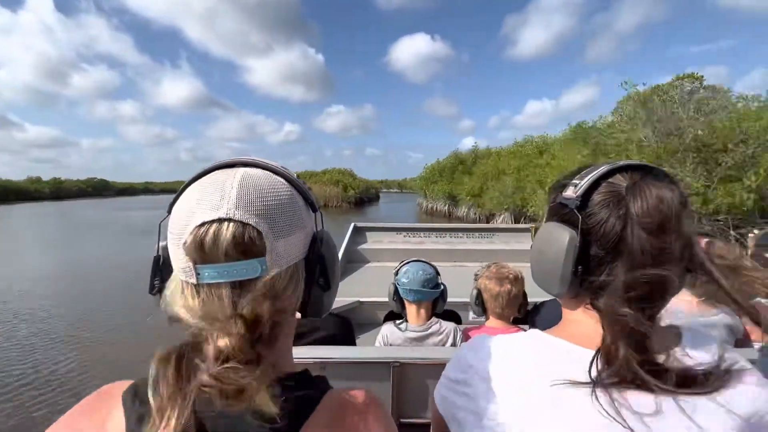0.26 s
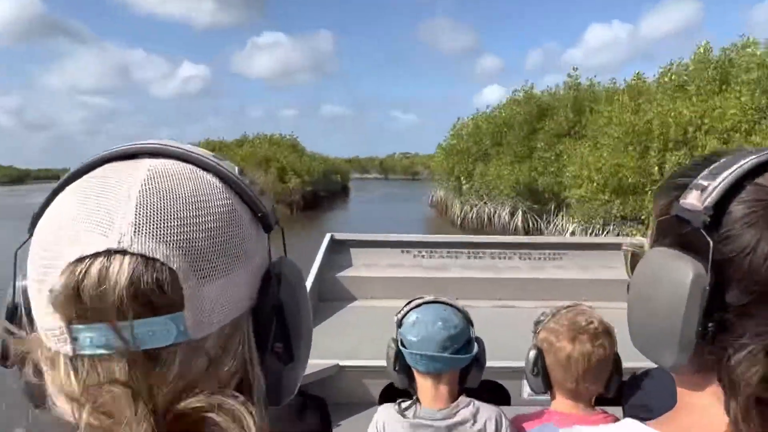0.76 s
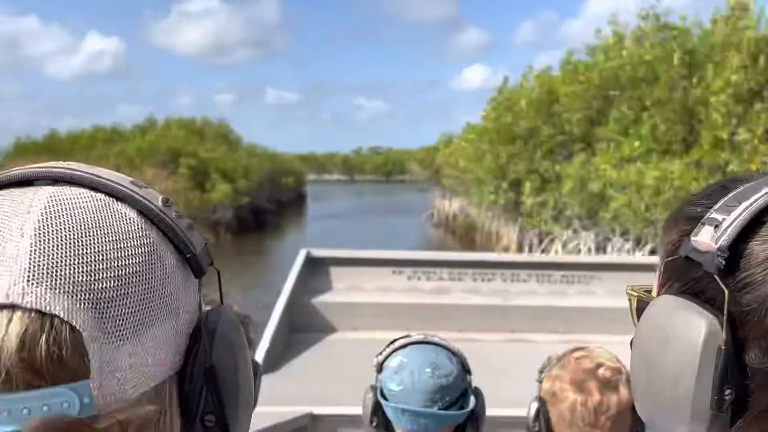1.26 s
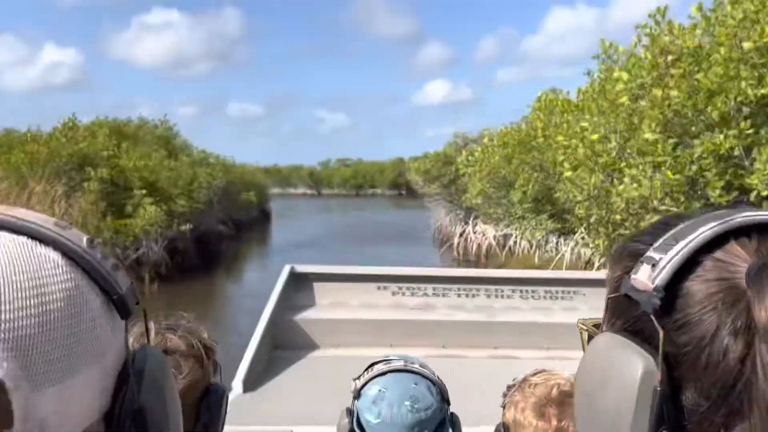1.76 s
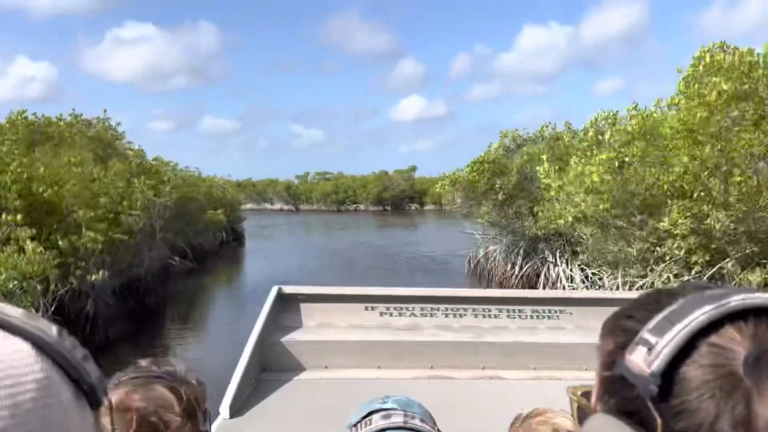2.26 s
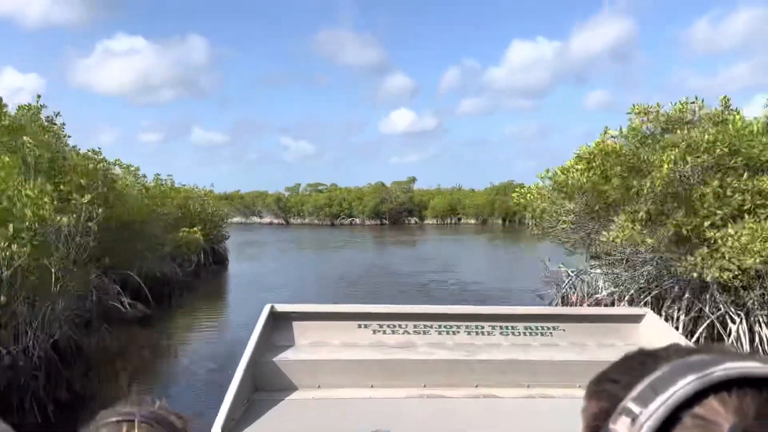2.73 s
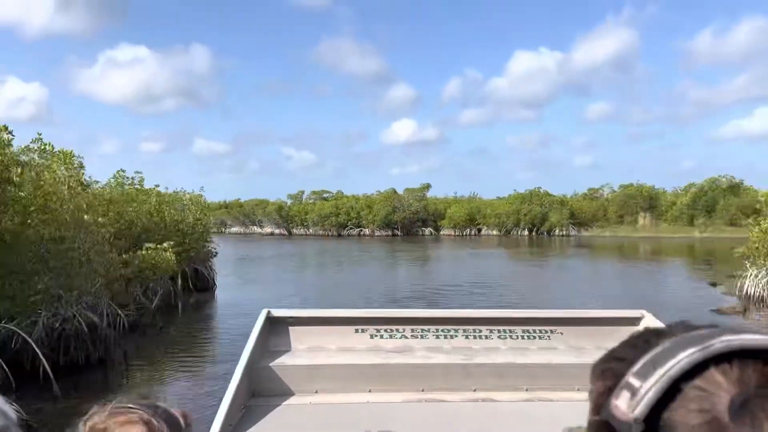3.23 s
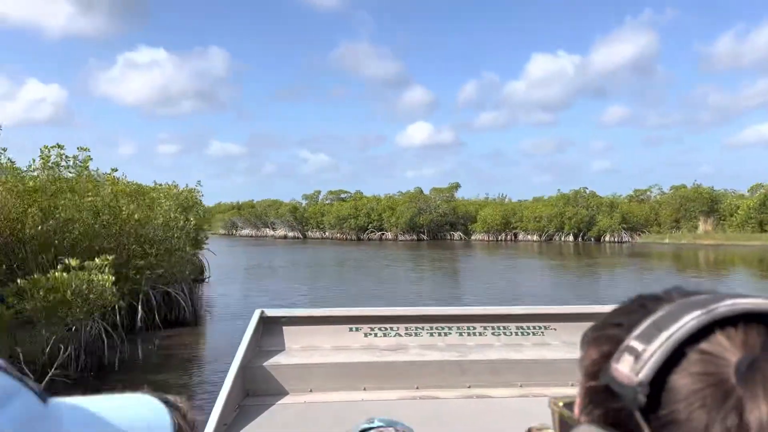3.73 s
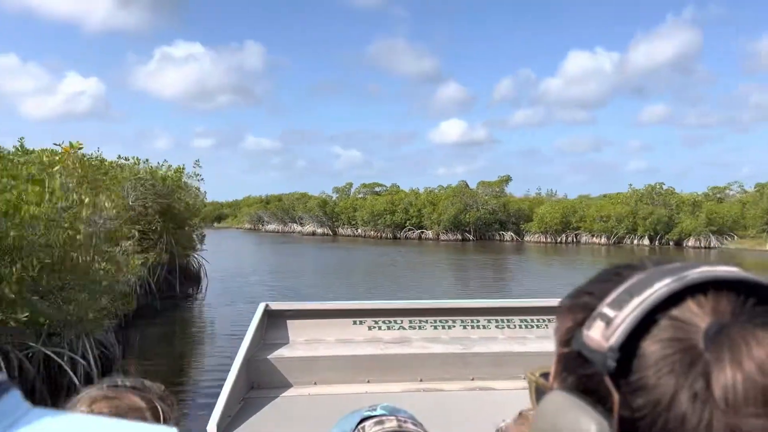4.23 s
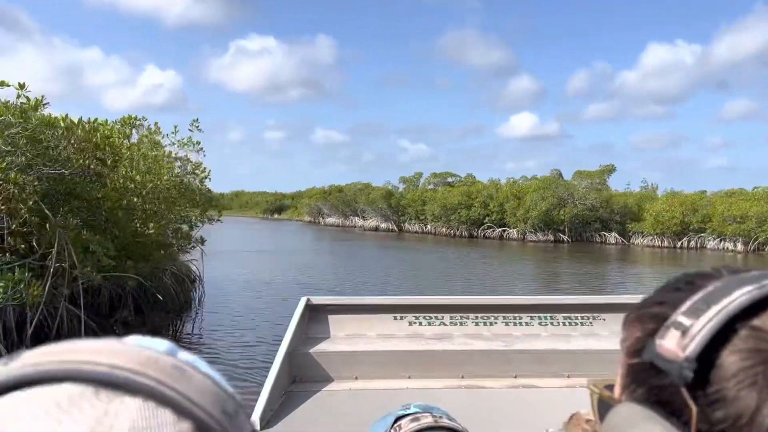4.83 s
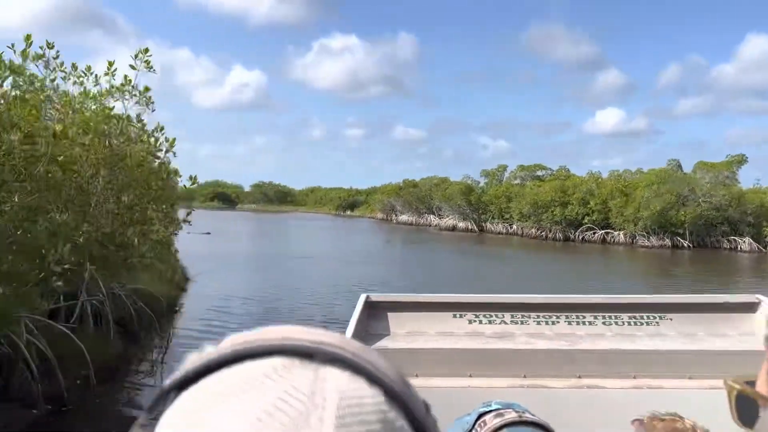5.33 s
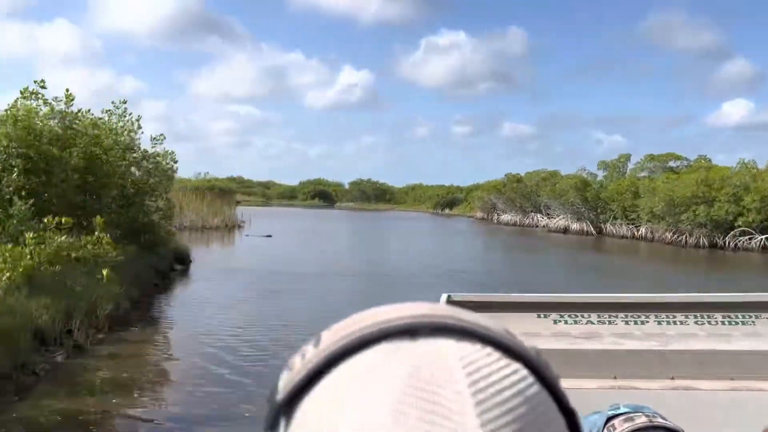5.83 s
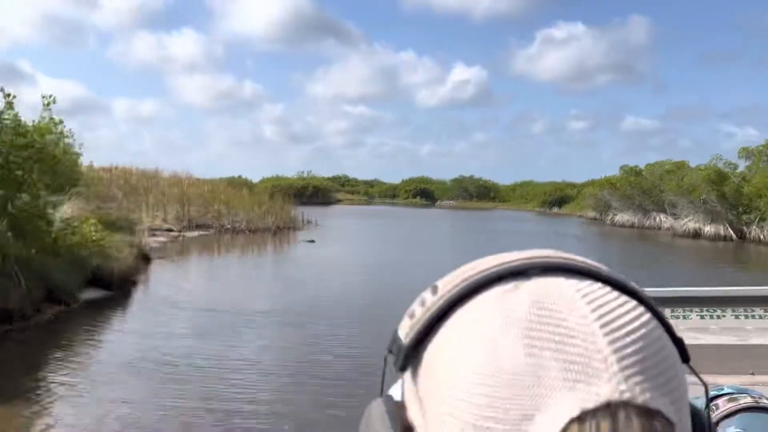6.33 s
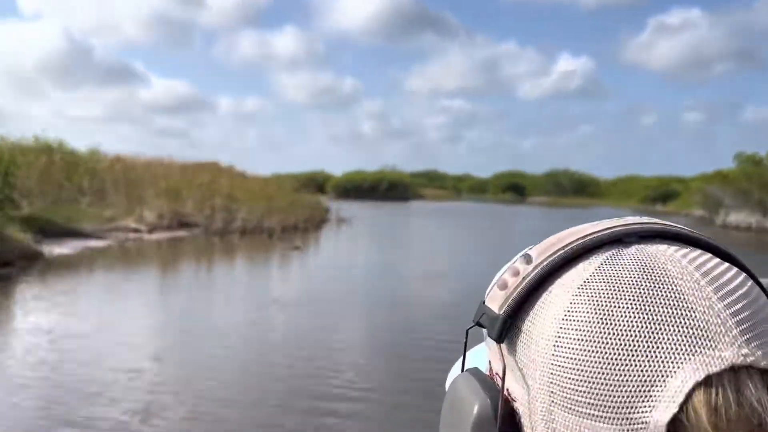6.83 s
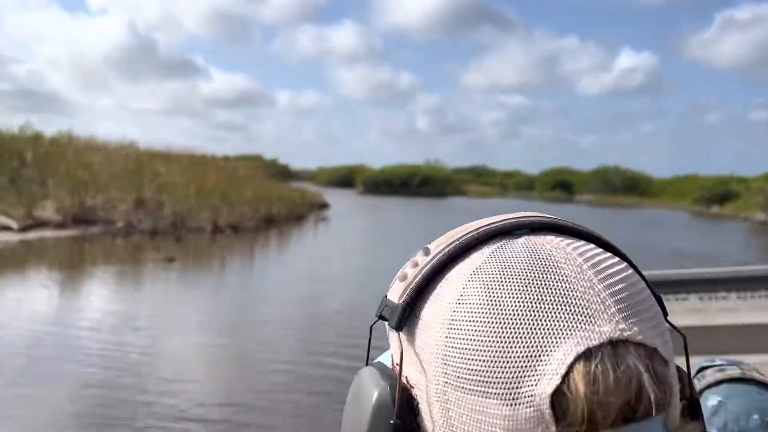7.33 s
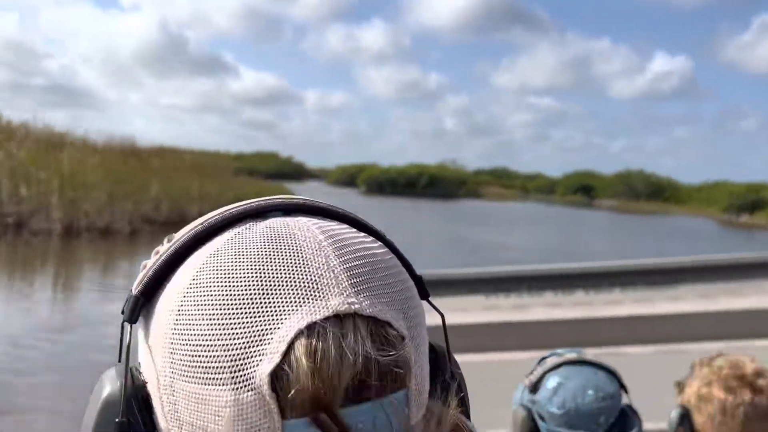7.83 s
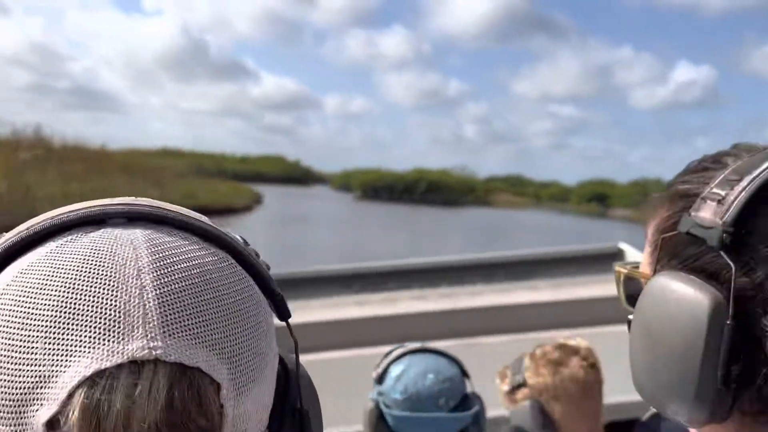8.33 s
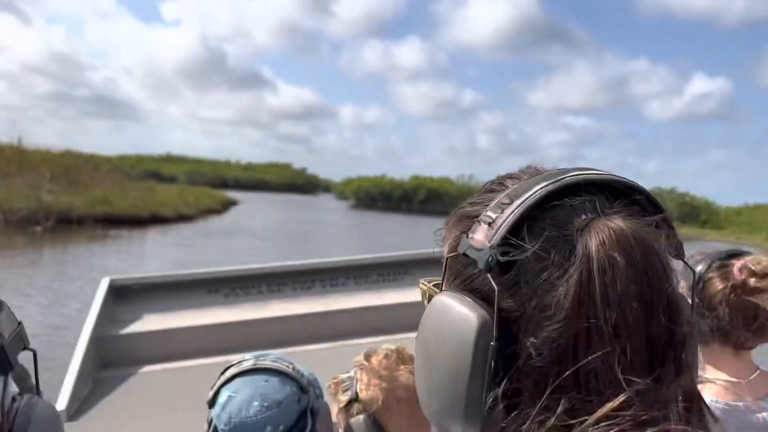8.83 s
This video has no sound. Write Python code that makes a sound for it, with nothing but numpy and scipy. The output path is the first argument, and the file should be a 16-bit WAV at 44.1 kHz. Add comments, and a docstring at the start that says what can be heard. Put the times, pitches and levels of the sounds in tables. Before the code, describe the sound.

Low chopped propeller roar of a moving airboat, heard from the seats, with spray hiss and gusting headwind that swells past the middle.

```python
"""An airboat under way, heard from the seats in front of its engine through hand-held stereo microphone ports.
A geared three-blade propeller drones in blade-pass tones, exhaust tones throb against it, and shaped noise makes
the chopped roar, spray, hiss and buffeting headwind. Churned water is close at first and fades by 1.5 s.
The wind surges past 6 s, the drone sags near 7 s and sharp gusts tick on the ports while the holder turns;
then a faint whine comes up, the drone recovers, and wash and wind swell again at the end."""
import sys
import numpy as np
from scipy import signal
from scipy.fft import rfft, irfft, next_fast_len
from scipy.io import wavfile
from scipy.ndimage import uniform_filter1d, map_coordinates

SR = 44100
rng = np.random.default_rng(int(sys.argv[2]) if len(sys.argv) > 2 else 0)


def output_pcm(signal):
    """Save a mono or channel-first signal as 16-bit PCM at the path in sys.argv[1].

    Samples are clipped to [-1, 1] before scaling.
    """
    pcm = np.clip(np.atleast_2d(signal).T, -1, 1) * 32767
    wavfile.write(sys.argv[1], SR, np.round(pcm).astype(np.int16))


N = 399987

BLADES, GEAR = 3, 2.2916  # blades; crank turns for each propeller turn
BLADE_START = .46  # starting angle (turns of the blade pass)
SLAP = 2.4  # the slap of each blade leads the blade-pass tone by this (rad)
FLUTTER_DB = 1.5  # fast chance swings of the wind

# Spectrum of wind turbulence on the ports: (frequency [Hz], relative density [dB per Hz])
BUFFET = [(13, -55), (22, -35), (58, -5), (89, -3), (134, -11), (260, -12.5), (400, -16.5), (544, -22),
          (772, -27), (1370, -41), (3000, -55), (3900, -78), (6600, -120)]


def propeller(blade):
    """Each passing blade presses on the air: harmonics of the blade pass, lined up into a slap."""
    # Multiples 1, 2, 3 .. of blade pass: (left level [dB], right level [dB], left lead [rad],
    # left change at a full turn of the holder [dB], right change [dB])
    harmonics = [(-17.0, -17.5, -0.06, 1.5, 1.0), (-30.0, -34.0, -0.24, -3.0, 0.0),
                 (-29.0, -26.5, 0.13, -1.0, -3), (-43.0, -35.0, 1.47, 7.0, -5.0),
                 (-44, -33.5, 0.0, 7.0, -11.0), (-50.5, -44.5, -1.2, 8, -3),
                 (-44.0, -36.0, 1.77, -2.0, -12.0), (-45.5, -34.5, 1.44, -5.0, -20.0),
                 (-44.5, -31.5, 0.58, -4.0, -16.0), (-49, -43.5, 0.64, 0, 8),
                 (-55.0, -45.0, 0.74, 1.0, -7.0), (-54.5, -47.5, 0.16, -7.0, -8.0),
                 (-52.5, -49.5, 0.08, -6.0, 4.0), (-48.5, -40.5, -0.87, -10.0, -9.0),
                 (-50.5, -45.0, -3.02, -15.0, -14.0), (-58.0, -48.5, -0.73, 0.0, -10.0),
                 (-48.0, -44, -1.1, -15.0, -14.0), (-51.0, -49.0, -1.89, -19.0, -11.0),
                 (-57.0, -49.0, -2.26, -12.0, -14.0), (-63.5, -54.0, -1.38, -9.0, -14.0),
                 (-60.5, -54.5, -1.28, -7.0, -15.0), (-65.5, -56.0, -1.12, -5.0, -15.0)]
    # The holder turning: (time [s], share of the turn [0-1], overtone gain [dB],
    # left port open to the middle tones [dB])
    holder = [(0, 0, 0, 8.5), (.45, 0, 0, 7.5), (1.3, 0, 0, 0), (3.5, .1, .5, 0), (5.8, .3, 1, 0),
              (7.2, .65, 1, 0), (8.6, .85, 1, 0), (9.07, .75, 2, 0)]
    open_order = 11  # the multiple that the open left port lifts most
    orders = np.arange(len(harmonics)) + 1
    turn, overtone_db, open_db = curves(holder)
    shade_db = []  # the body shades each port its own way
    for k, (*_, left, right) in zip(orders, harmonics):
        opening = np.exp(-2 * np.log(k / open_order) ** 2) * open_db
        port_db = np.array([turn * left + opening, turn * right])
        shade_db.append((1 - 1 / k) * overtone_db + port_db)
    return tones(orders, harmonics, blade, shade_db, waver_db=.75, drift=.4, slap=SLAP)


def exhaust(blade):
    """Uneven firing beats at half orders of the crank, which is geared to the propeller."""
    # One row for each half order: (left level [dB], right level [dB], left lead [rad])
    beat_levels = [(-36.5, -37, 0), (-25.5, -26.5, -.07), (-35, -35, -.2), (-44, -43, -.25),
                   (-38, -40, -.4), (-35.5, -40, .2), (-45, -37, 2.4), (-41.5, -38, .3), (-47, -48, 3),
                   (-48, -52, -.26), (-46, -39.5, .6), (-48, -51, -.1), (-59, -49, .2), (-56, -50, -.3),
                   (-57, -52, .4), (-52.5, -46.5, .8), (-56, -50, .8), (-47.5, -50, 1.1)]
    # Tones that sound: (multiple [halves of the crank speed])
    half_orders = [2, 3, 5, 6, 7, 8, 9, 10, 11, 12, 13, 14, 15, 18, 22, 24, 25, 26]
    crank_start = .19  # turns
    crank = (blade - 2 * np.pi * BLADE_START) * GEAR / BLADES + 2 * np.pi * crank_start
    beats = np.array(half_orders) / 2
    return tones(beats, beat_levels, crank, 0 * beats, waver_db=.8, drift=.25, slap=0)


def whine(blade):
    """A faint high tone that follows the propeller speed with a random drift of phase."""
    # Fader: (time [s], level [dB])
    whine_db = [(0, -80), (7.6, -68), (7.9, -56), (8.35, -58), (8.5, -63), (9.07, -62)]
    phase = 36.8 * blade + .8 * wobble(8)  # multiples of blade pass
    return np.sqrt(2) * amp(curves(whine_db)[0]) * np.cos(phase)


def tones(orders, levels, angle, gains_db, waver_db, drift, slap):
    """Multiples of a shaft angle, lined up into a pulse by slap; higher ones waver more in the turbulent air."""
    waver_grows, waver_top = .35, 5  # growth by octave of the multiple, up to this multiple
    out = np.zeros((2, N))
    for k, (left_db, right_db, lead, *_), gain_db in zip(orders, levels, gains_db):
        high = 1 - orders[0] / k
        smear = high * rng.normal(0, .55)  # echoes off the hull and seats spread the pulse
        phase = k * angle + slap * (k - 1) + smear + drift * high * wobble(3)
        depth_db = waver_db * (1 + waver_grows * np.log2(min(k / orders[0], waver_top)))
        swing_db = depth_db * (wobble(7) + wobble(1.5) / 2)
        level = np.sqrt(2) * amp(gain_db + swing_db - depth_db ** 2 / 7)  # offsets the power the swings add
        out += level * amp([[left_db], [right_db]]) * np.cos(phase + [[lead / 2], [-lead / 2]])
    return out


def airflow(blade):
    """Noise from moving air and water: blade roar, spray and wash along the hull, and a thin steady slipstream."""
    # Spectra of the roar, spray, wash and hiss: (frequency [Hz], relative density [dB per Hz])
    roar_colour = [(60, -24), (110, -17), (200, -17), (290, -15.5), (380, -7), (480, -10.5), (600, -12.5),
                   (750, -10.5), (950, -12.5), (1200, -12), (1550, -13.5), (2050, -18), (2600, -24),
                   (4000, -25.5), (7000, -69)]
    spray_colour = [(1200, -6), (2000, -27), (3830, -13.5), (5000, -5.5), (6710, -6.5), (8000, -10.5),
                    (9300, -18), (11000, -107), (16000, -33)]
    wash_colour = [(450, -16), (800, -3), (1250, 17), (1700, -33), (2400, 0.5), (3500, 3.5), (5500, 0.5),
                   (9500, -5.5), (11000, -59)]
    hiss_colour = [(6000, -30), (8500, -4), (10500, -4), (11700, 0), (13500, -5), (15700, -6)]
    # Stereo width: (frequency [Hz], left-right likeness [correlation])
    likeness = [(170, .95), (340, .65), (520, .35), (1000, .45), (2300, .55), (3200, .17), (7000, .22),
                (15000, .2)]
    # Faders of roar and spray: (time [s], roar level [dB], spray level [dB])
    flow_db = [(0, -29.5, -35), (.55, -30, -38.5), (1.15, -34, -41.5), (2.4, -32, -39), (3.6, -31.5, -37.5),
               (4.6, -31, -38.5), (6.6, -32.5, -41), (7.7, -33.5, -43), (8.4, -33.5, -41),
               (9.07, -31, -37.5)]
    # Fader of the churned water close by: (time [s], level [dB])
    wash_db = [(0, -35.5), (.35, -34.5), (.7, -35), (1.0, -41.5), (1.5, -56), (8.2, -73), (9.07, -43)]
    roar_db, spray_db = curves(flow_db)
    shared = wobble(9)  # roar and spray swell together
    roar = ports(patchy(1.7) * chopped(blade, blade_db=.96, turn_db=.5), roar_colour, likeness)
    spray = ports(patchy(1.3) * chopped(blade, blade_db=1.1, turn_db=.5), spray_colour, likeness)
    wash = ports(patchy(2.2) * chopped(blade, blade_db=2.2, turn_db=.5), wash_colour, likeness)
    hiss = ports(patchy(2.5), hiss_colour, likeness)
    roar *= amp(roar_db + .27 * shared)
    spray *= amp(spray_db + .12 * shared)
    wash *= amp(curves(wash_db)[0])
    return shadowed(roar + spray + wash) + amp(-47) * hiss


def chopped(blade, blade_db, turn_db):
    """Loudness peaks once per blade, and once per turn as the blades differ."""
    return amp(blade_db * np.cos(blade + SLAP) - turn_db * np.cos(blade / BLADES))


def shadowed(x):
    """The hand and the housing shade and delay one port against the other."""
    # Balance: (frequency [Hz], left minus right [dB])
    lean = [(60, 12), (110, 22), (200, -25), (380, -7), (700, -5), (1290, -4.5), (2380, -0.5), (4400, 1),
            (8120, 5.5), (15000, -16)]
    # Phase: (frequency [Hz], left lead [rad])
    lead = [(300, 0), (720, 1.0), (1100, 0), (1650, -1.5), (2400, 0), (3300, -.7), (4500, .3)]

    def half(hz):
        return amp(along(lean, hz) / 2) * np.exp(.5j * along(lead, hz))
    return filtered(x, lambda hz: np.array([half(hz), 1 / half(hz)]))


def headwind():
    """Turbulence buffets both ports: lumpy steady wind and duller strong eddies."""
    # Fader of the steady wind: (time [s], level [dB])
    wind_db = [(0, -38.5), (.5, -24.5), (1.25, -22), (1.7, -25), (2.6, -27), (3.5, -28), (4.8, -29.5),
               (5.6, -24.5), (6.4, -20), (7.2, -19.5), (7.9, -22.5), (8.4, -25.5), (9.07, -18)]
    alike = [(40, .86), (150, .9), (600, .73)]  # (frequency [Hz], left-right likeness [correlation])
    eddy_hz, eddy_dull_db = 256, -7  # strong eddies are duller above this
    lumps_db = 2.1  # slower chance swings
    swing_db = lumps_db * wobble(9) + FLUTTER_DB * wobble(35)
    steady = amp(curves(wind_db)[0] + swing_db) * ports(patchy(1.26), BUFFET, alike)

    def dull(hz):
        return amp(eddy_dull_db / (1 + (eddy_hz / (hz + 1)) ** 4))
    eddies = gusts() * filtered(ports(patchy(.94), BUFFET, alike), dull)
    return steady + eddies


def gusts():
    """A short bell-shaped swell of power for each strong eddy, with some flutter."""
    # Single strong eddies: (time [s], peak level before flutter and dulling [dB])
    eddy_peaks = [(.66, -18), (.93, -31), (1.07, -26), (1.23, -12), (1.38, -16), (1.66, -16.5), (2.12, -24),
                  (2.5, -14.5), (3.59, -29), (3.95, -23), (5.03, -25), (5.5, -16.5), (5.76, -21),
                  (5.92, -16.5), (6.02, -18), (6.1, -18.5), (6.25, -14), (6.43, -14), (6.63, -12),
                  (6.72, -11), (6.85, -13.5), (6.95, -26), (7.06, -12), (7.15, -18), (7.22, -17),
                  (7.45, -16.5), (7.63, -12.5), (7.76, -22), (8.03, -19), (8.18, -26), (8.36, -15.5),
                  (8.67, -17.5), (8.78, -12.5), (9.02, -24)]
    rise_s, fall_s = .026, .034
    t, power = np.arange(N) / SR, np.zeros(N)
    for s, db in eddy_peaks:
        near = slice(max(round(s * SR) - SR // 4, 0), round(s * SR) + SR // 4)
        late = t[near] - s
        width = np.where(late < 0, rise_s, fall_s)
        power[near] += amp(db) ** 2 * np.exp(-(late / width) ** 2)
    return np.sqrt(power) * amp(FLUTTER_DB * wobble(35))


def ticks():
    """Sharp gusts tick on the ports: an uneven dying ring, a low push against it and a puff of noise."""
    # One row a tick: (time [s], strength before the common lift [dB], pitch [Hz], fade by 60 dB [cycles])
    tick_list = [(1.0335, -27, 2500, 11), (2.0206, -45, 2500, 11), (6.716, -28, 4200, 20),
                 (6.7165, -31, 2300, 14), (6.7635, -42, 2200, 14), (6.8494, -40, 2600, 14),
                 (6.946, -41, 4200, 16), (7.0500, -45, 2800, 14), (7.073, -27, 3300, 13),
                 (7.144, -28, 3100, 20), (7.21, -33, 2700, 14), (7.386, -37, 4000, 16),
                 (7.415, -43, 3200, 12), (7.5325, -37, 2400, 22), (7.572, -33, 3000, 16),
                 (7.599, -33, 2400, 32), (7.605, -31, 3000, 30), (7.741, -41, 2000, 30),
                 (8.7767, -29, 2600, 18)]
    unevenness, push_db, puff_db = 1.1, 2, -6
    t, out = np.arange(SR // 30) / SR, np.zeros(N)

    def ring(hz, cycles):
        return np.sin(2 * np.pi * hz * t) * amp(-60 * t * hz / cycles)
    push = amp(push_db) * ring(1400, 12)
    for s, db, hz, cycles in tick_list:
        rattle = 1 + unevenness * uniform_filter1d(rng.standard_normal(len(t)), size=9) * 3
        puff = amp(puff_db - 60 * t / .031) * rng.standard_normal(len(t))
        onset = amp(db + 6.5) * (1 - np.exp(-t / .0004))
        out[round(s * SR):][:len(t)] += onset * (ring(hz, cycles) * rattle - push + puff)
    return filtered(out, lambda hz: 1 / (1 + (hz / 5000) ** 4))  # softens the edges


def amp(db):
    """Decibels to a linear factor."""
    return 10 ** (np.asarray(db) / 20)


def unit(x):
    """Scales x to an rms of 1."""
    return x / np.sqrt(np.mean(x ** 2) + 1e-20)


def along(points, hz):
    """Reads (Hz, value) points on a log frequency axis."""
    f, v = np.transpose(points)
    return np.interp(np.log(hz + 1), np.log(f + 1), v)


def curves(rows):
    """One value per sample for each column after the time."""
    s, *cols = np.transpose(rows)
    return [np.interp(np.arange(N) / SR, s, c) for c in cols]


def wobble(rate):
    """A smooth random curve, rate knots a second."""
    knots = rng.standard_normal(int(N * rate / SR) + 4)
    coarse = map_coordinates(knots, [np.arange(0, N + 64, 64) * rate / SR])
    return np.interp(np.arange(N), np.arange(len(coarse)) * 64, coarse)


def filtered(x, response):
    """x times a complex response of frequency."""
    m = next_fast_len(N + SR // 2)
    return irfft(rfft(x, m) * response(np.fft.rfftfreq(m, 1 / SR)), m)[..., :N]


def patchy(patchy_db):
    """Two unrelated noises that share patches of random gain in time and frequency."""
    z = signal.stft(rng.standard_normal((2, N)), nperseg=512)[2]
    field = uniform_filter1d(rng.standard_normal(z.shape[1:]), size=6, axis=0)
    field = uniform_filter1d(field, size=10, axis=1)
    return signal.istft(z * amp(patchy_db * unit(field)), nperseg=512)[1][:, :N]


def ports(pair, spectrum, alike):
    """Colours a noise pair and spreads it over the two ports as mid and side; rms 1."""
    def response(hz):
        angle = np.arccos(np.clip(along(alike, hz), -1, 1)) / 2
        return amp(along(spectrum, hz)) * [np.cos(angle), np.sin(angle)]
    mid, side = filtered(pair, response)
    return unit(np.array([mid + side, mid - side]))


def scene():
    """One blade angle drives the engine tones and chops the airflow; the headwind blows apart from it."""
    # Propeller speed: (time [s], rate [blade passes a second])
    speed = [(0, 85.33), (.7, 85.37), (1.8, 85.15), (2.35, 84.74), (3.3, 85.06), (3.9, 85.93), (4.8, 86.38),
             (5.15, 86.23), (5.7, 86.59), (6.62, 86.71), (7.15, 83.14), (7.5, 82.15), (8.5, 82.59),
             (9.07, 84.38)]
    blade = 2 * np.pi * (np.cumsum(curves(speed)[0]) / SR + BLADE_START)
    engine = propeller(blade) + exhaust(blade) + whine(blade)
    return engine + airflow(blade) + headwind() + ticks()


def record(dry):
    """The recorder rounds off loud peaks, thins the deepest bass and keeps nothing above its band limit."""
    bass_hz, top_hz, ceiling = 28, 15730, .9  # roll-off; band limit; level that loud peaks bend towards
    soft = dry / (1 + np.abs(dry / ceiling) ** 6) ** (1 / 6)
    return filtered(soft, lambda hz: (hz < top_hz) * hz ** 2 / np.sqrt(hz ** 4 + bass_hz ** 4))


dry = scene()
out = record(dry)
output_pcm(out)
```